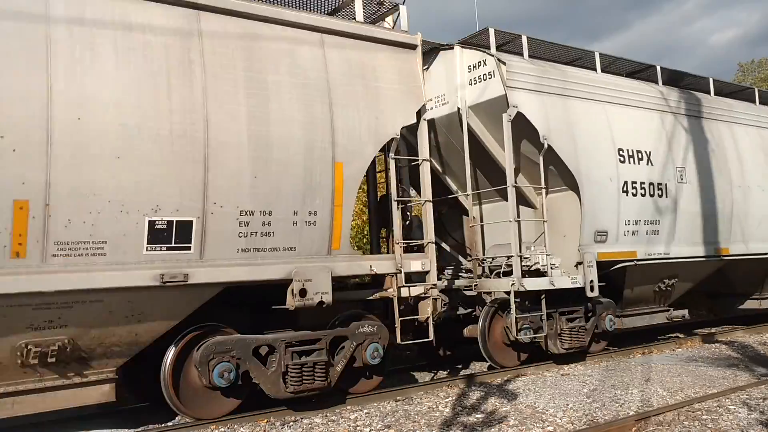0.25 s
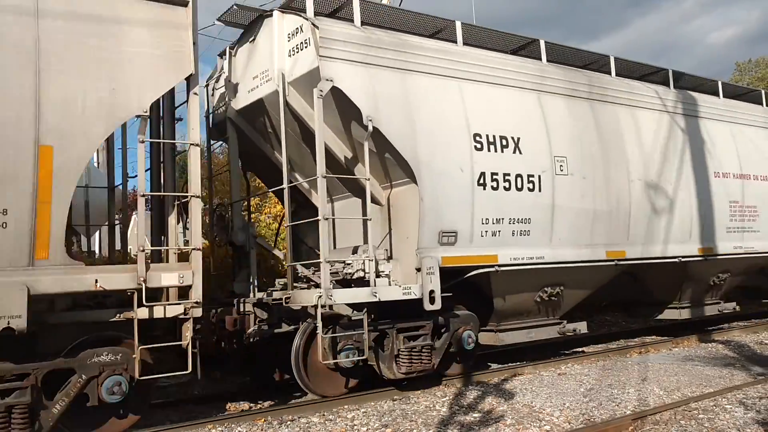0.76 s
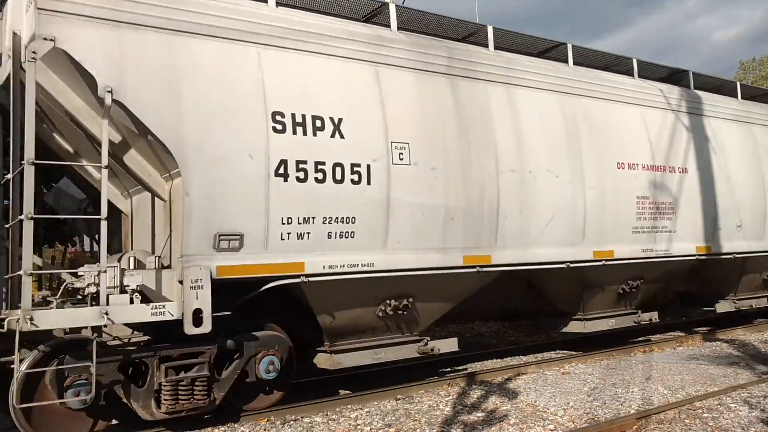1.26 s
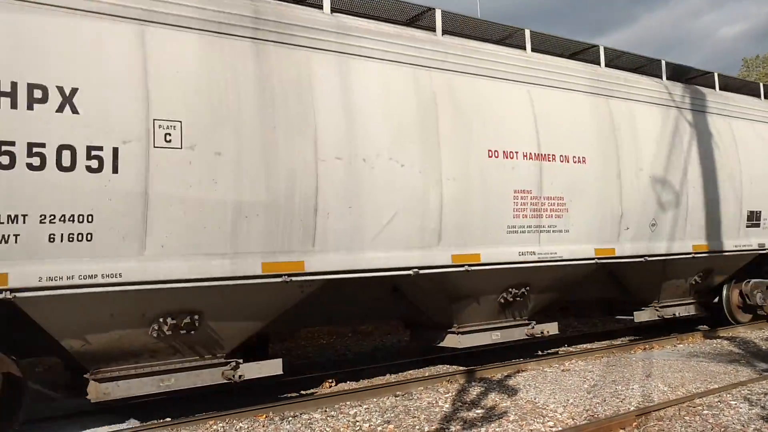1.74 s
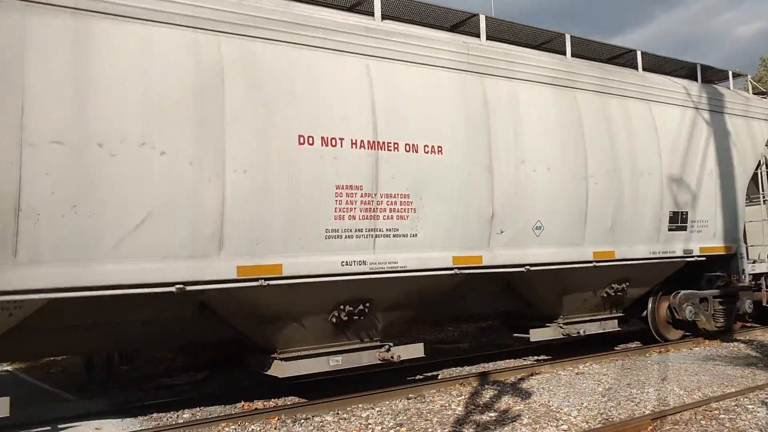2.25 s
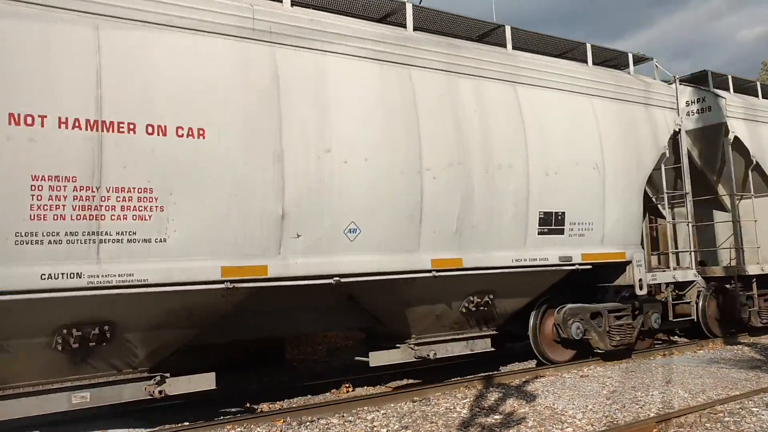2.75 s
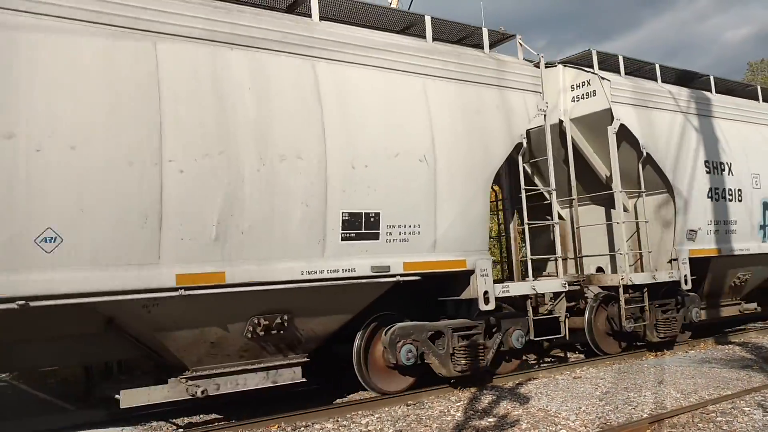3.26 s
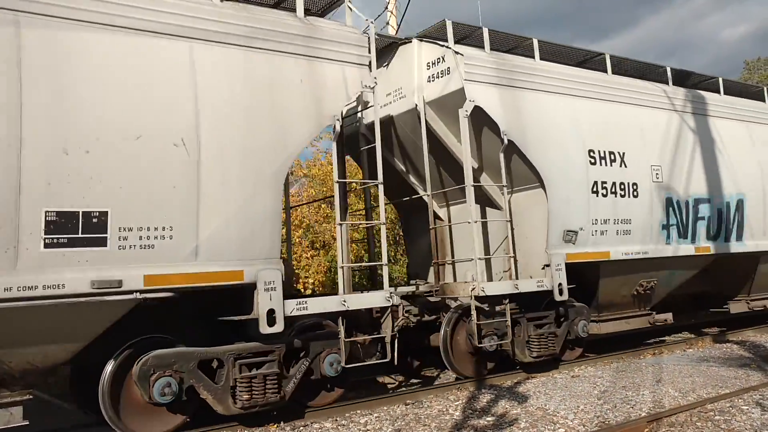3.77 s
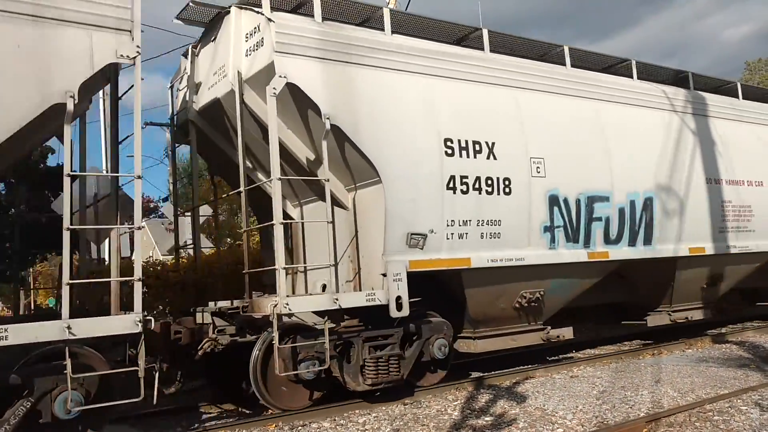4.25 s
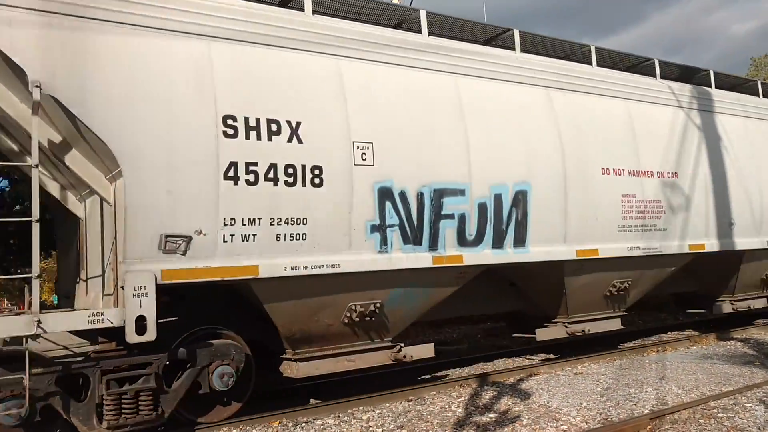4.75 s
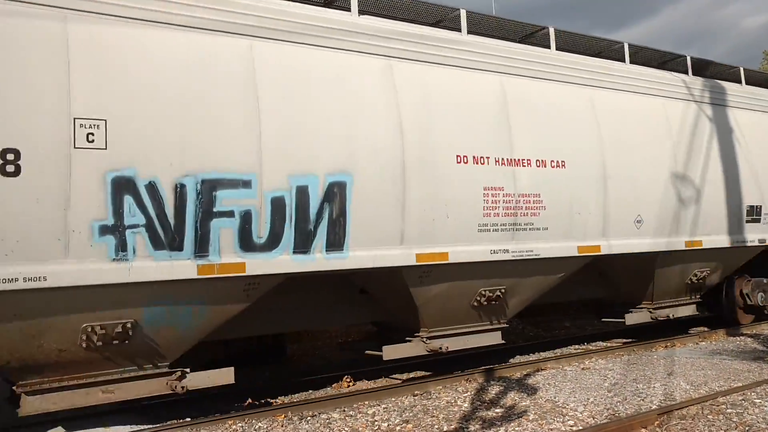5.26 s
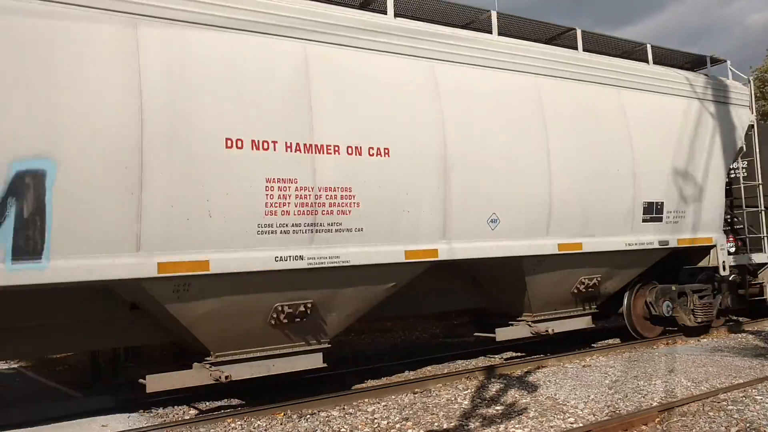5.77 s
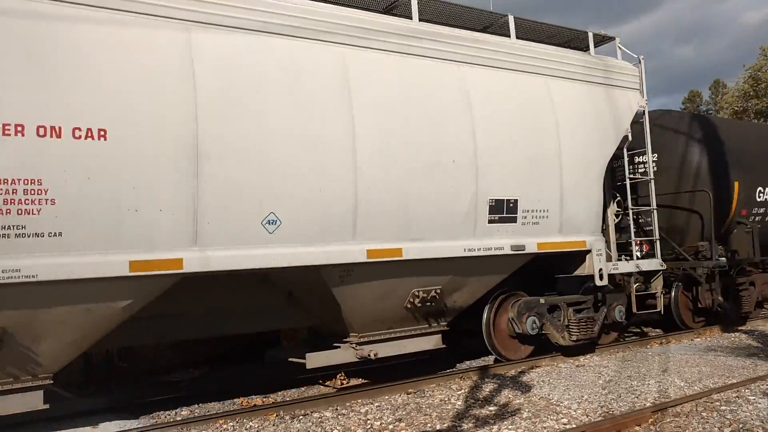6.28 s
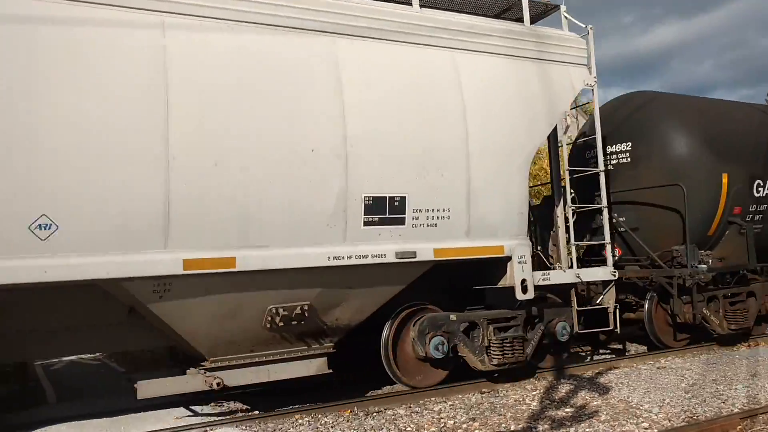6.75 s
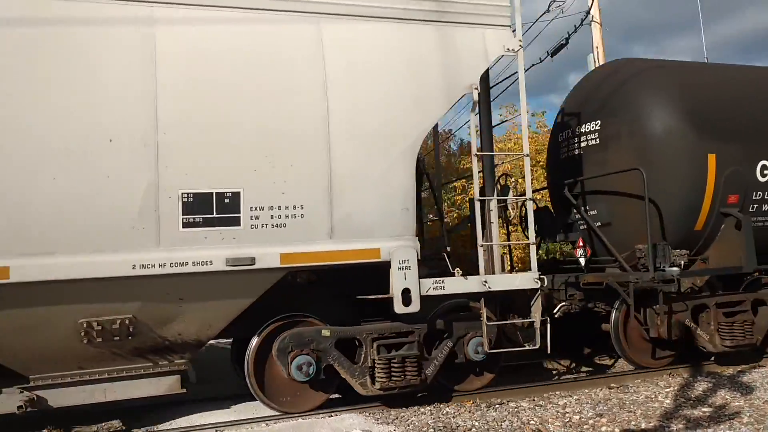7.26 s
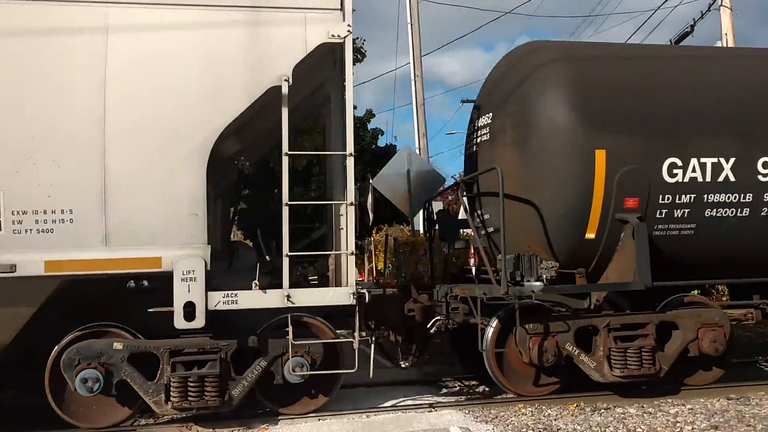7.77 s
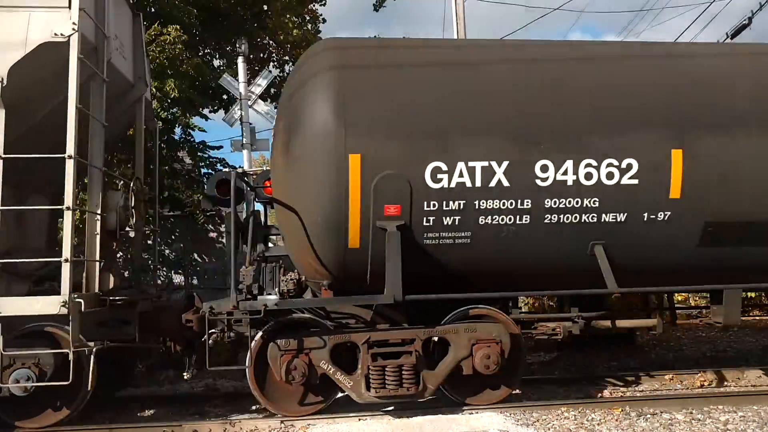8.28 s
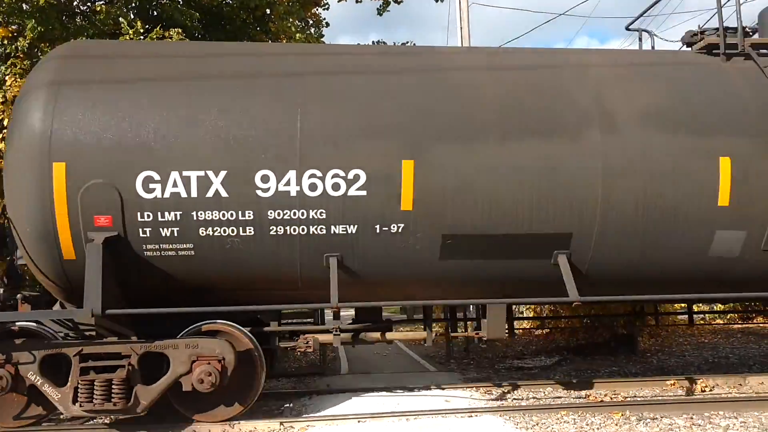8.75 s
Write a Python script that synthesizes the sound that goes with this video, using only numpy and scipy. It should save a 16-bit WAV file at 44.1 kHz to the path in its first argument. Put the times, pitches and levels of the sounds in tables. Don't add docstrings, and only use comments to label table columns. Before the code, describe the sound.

Close beside the track, a coarse metallic rolling roar swells and dips, peppered with hard wheel knocks, clanks and short high steel singing.

```python
import sys
import numpy as np
from scipy import signal
from scipy.fft import rfft, irfft, next_fast_len
from scipy.io import wavfile
from scipy.ndimage import uniform_filter1d, map_coordinates

SR = 44100
rng = np.random.default_rng(int(sys.argv[2]) if len(sys.argv) > 2 else 0)


def elevation(decibels):
    levels = np.asarray(decibels, float)
    return 10 ** (levels / 20)


def store_wav(level_fs):
    pcm = np.round(np.clip(np.atleast_2d(level_fs), -1, 1) * 32767)
    wavfile.write(sys.argv[1], SR, pcm.T.astype(np.int16))


N = 397782

# pitch_hz, level_db (per Hz)
ROAR_TONE = [(200, -12), (400, -8.5), (620, 2), (850, -3.5), (1250, -1), (1700, -5), (2300, -12),
             (3200, -31)]
# pitch_hz, level_db (per Hz)
GRIND_TONE = [(1800, -48), (2600, 1), (3400, 2.5), (4200, -2), (5000, -3.5), (6500, -25)]
# pitch_hz, level_db (per Hz)
HISS_TONE = [(3800, -20), (5200, 0), (7000, -0.5), (8500, -2), (9400, -6.5), (11000, -4), (13500, -23),
             (15000, -22), (15600, -45)]
PORT_DELAY_S = 1 / 2510


def unit(x):
    return x / np.sqrt(np.mean(x ** 2) + 1e-20)


def along(points, hz, column=1):
    rows = np.array(points)
    return np.interp(np.log(hz + 1), np.log(rows[:, 0] + 1), rows[:, column])


def wobble(rate):
    knots = rng.standard_normal(int(N * rate / SR) + 4)
    return map_coordinates(knots, [np.arange(N) * rate / SR])


def filtered(x, response):
    n = x.shape[-1]
    m = next_fast_len(n + 4096)
    spectrum = rfft(x, m) * response(np.fft.rfftfreq(m, 1 / SR))
    return irfft(spectrum, m)[..., :n]


def coloured(x, tone):
    return unit(filtered(x, lambda hz: elevation(along(tone, hz))))


def patchy(depth_db, grit_db):
    z = signal.stft(rng.standard_normal((2, N)), nperseg=512)[2]
    field = uniform_filter1d(rng.standard_normal(z.shape[1:]), 5, 0)
    field = uniform_filter1d(field, 9, 1)
    pair = signal.istft(z * elevation(depth_db * unit(field)), nperseg=512)[1][:, :N]
    return pair * elevation(grit_db * wobble(350))


def add(out, x, s):
    part = out[:, max(round(s * SR), 0):][:, :x.shape[1]]
    part += x[:, :part.shape[1]]


def rolling():
    # time_s, rumble_db, roar_db, grind_db, hiss_db
    passing = [(0.0, -34.5, -31.5, -38.5, -38.5), (0.5, -34, -30.5, -39.5, -42),
               (0.7, -33.5, -27.5, -36.5, -39), (0.85, -35, -29.5, -36.5, -34),
               (1.05, -37.5, -29, -36, -37.5), (1.36, -38, -34.5, -41, -42),
               (1.76, -39.5, -35.5, -41, -42.5), (1.98, -37.5, -32, -40, -42.5), (2.11, -41, -36, -43, -41),
               (2.26, -36.5, -36, -39, -41), (2.36, -37.5, -36, -44, -44), (2.51, -41, -37, -44, -45),
               (2.59, -42.5, -41, -49.5, -48.5), (2.76, -39, -35, -48.5, -48), (2.89, -36, -36, -42, -43),
               (3.04, -37, -29.5, -41.5, -41), (3.34, -37, -29, -39.5, -36), (3.47, -35.5, -29, -37, -36.5),
               (3.67, -34, -27.5, -38, -39), (3.94, -30.5, -25, -40, -40), (4.1, -35, -26.5, -34, -31.5),
               (4.22, -31, -19.5, -28, -24.5), (4.37, -39.5, -29, -38.5, -39.5),
               (4.62, -37.5, -33, -39.5, -40.5), (4.9, -35.5, -32.5, -41.5, -45.5),
               (5.05, -38, -33, -45, -43.5), (5.3, -37, -35.5, -41, -42.5), (5.43, -36.5, -32, -47, -46),
               (5.57, -37.5, -35, -39, -40), (5.75, -35.5, -30.5, -40.5, -39), (5.88, -40, -29, -40, -44),
               (5.95, -40, -38, -51, -50), (6.13, -39.5, -35, -49, -47), (6.23, -37, -32.5, -43, -41),
               (6.35, -37, -27, -42.5, -43), (6.45, -34.5, -29.5, -38.5, -40), (6.61, -31, -23, -39, -39.5),
               (6.73, -38.5, -32, -41.5, -38), (6.86, -31, -21.5, -33, -28.5),
               (7.11, -35, -27.5, -41.5, -44), (7.23, -34.5, -27, -42.5, -40),
               (7.34, -32.5, -21, -33.5, -35), (7.46, -33.5, -23, -33.5, -30), (7.51, -34, -20, -33, -28.5),
               (7.59, -32, -21, -34, -33), (7.71, -33, -27.5, -39, -41), (7.76, -38.5, -33.5, -41.5, -43),
               (7.91, -35, -27.5, -41, -39), (8.06, -39.5, -32, -43, -41), (8.27, -40, -32.5, -41.5, -43.5),
               (8.41, -39.5, -29, -41.5, -44.5), (8.59, -39, -32, -42.5, -45), (8.67, -36.5, -28, -41, -38),
               (9.02, -40, -38.5, -47, -42.5)]
    # pitch_hz, level_db (per Hz)
    rumble_tone = [(25, -33), (50, -4.5), (80, -3.5), (160, 1), (280, -4), (450, -8), (800, -57)]
    time_s, *levels = np.transpose(passing)
    t = np.arange(N) / SR
    rumble_db, roar_db, grind_db, hiss_db = (np.interp(t, time_s, db) for db in levels)
    jolts = wobble(22)
    rumble = elevation(rumble_db + 5.5) * coloured(patchy(1.6, 0.3), rumble_tone)
    roar = elevation(roar_db - 1.5 + 1.27 * jolts) * coloured(patchy(2.36, 1.06), ROAR_TONE)
    grind = elevation(grind_db - 2.65 + 0.87 * jolts) * coloured(patchy(1.57, 1.6), GRIND_TONE)
    hiss = elevation(hiss_db - 2.47 + 1.2 * jolts) * coloured(patchy(2.3, 1.1), HISS_TONE)
    return rumble + roar + grind + hiss


def contacts(t, starts, sizes, life_s):
    age = np.maximum(t - starts, 0)
    hits = sizes * (1 - np.exp(-age / 0.0012)) * elevation(-60 * age / life_s)
    return np.sqrt(np.sum(hits ** 2, axis=0))


def wheel_ring(t, modes):
    hz, mode_db = np.transpose(modes)[:, :, None]
    detuned = hz * rng.normal(1, 0.00606, hz.shape)
    phase = 2 * np.pi * (detuned * t + rng.random((2, len(hz), 1)))
    fade_s = rng.uniform(0.24, 0.75, hz.shape)
    strength = elevation(mode_db + rng.normal(0, 5.1, hz.shape) - 60 * t / fade_s)
    return (1 - np.exp(-t / 0.004)) * np.sum(strength * np.sin(phase), axis=1)


def joints():
    # start_s, knock_db, knock_hz, clank_db and crash_db (over the knock),
    # t60_s (time to die by 60 dB)
    blows = [(0.009, -16, 533, -14, -18.5, 0.15), (0.16, -7, 1220, -13.5, -18, 0.14),
             (0.471, -18, 606, -13, -11.5, 0.22), (0.605, -6.5, 630, -12.5, -21, 0.12),
             (0.804, -6.5, 1080, -13, -18, 0.1), (0.921, -5, 821, -9.5, -17.5, 0.14),
             (1.241, -10.5, 530, -3.5, -10, 0.13), (1.477, -20, 554, -5, -11.5, 0.13),
             (1.693, -7, 575, -7, -14, 0.11), (2.022, -10, 600, -7.5, -13.5, 0.13),
             (2.136, -6.5, 640, -17, -18.5, 0.16), (2.259, -28, 576, 1, -5, 0.13),
             (2.332, -23, 571, -4.5, -17, 0.17), (2.463, -8.5, 1020, -15, -16, 0.14),
             (2.895, -7.5, 1230, -16.5, -11.5, 0.15), (3.124, -15.5, 463, -12, -17.5, 0.19),
             (3.227, -4, 1100, -15.5, -15.5, 0.12), (3.458, -15.5, 1830, -14, -14, 0.12),
             (3.554, -10, 554, -13.5, -17.5, 0.2), (3.9, -13.5, 684, -14, -15.5, 0.18),
             (3.978, -6, 624, -14.5, -27, 0.15), (4.222, -10, 1070, -9, -17, 0.15),
             (4.309, -10, 1370, -5, -10.5, 0.16), (4.648, -10.5, 1000, -7.5, -12, 0.17),
             (4.869, -26, 487, -9, -11, 0.18), (5.073, -8.5, 619, -7.5, -14, 0.13),
             (5.284, -18.5, 664, -19, -25, 0.19), (5.402, -11, 800, -4, -12, 0.16),
             (5.517, -8, 604, -13, -16.5, 0.14), (5.755, -20, 611, -23, -19, 0.14),
             (5.845, -8.5, 497, -18, -12, 0.12), (6.179, -21.5, 506, -16, -19, 0.17),
             (6.286, -9, 1220, -16.5, -10.5, 0.14), (6.609, -7, 670, -12, -14.5, 0.15),
             (6.73, -16.5, 627, -17, -21, 0.14), (6.945, -8, 541, -11, -12.5, 0.1),
             (7.102, -18.5, 1480, -22, -17, 0.22), (7.279, -17, 1040, -14, -10, 0.14),
             (7.373, -7, 627, -16, -17, 0.12), (7.45, -11, 1380, -15, -18, 0.18),
             (7.604, -11, 1400, -11.5, -11.5, 0.23), (7.702, -10.5, 1280, -11, -9.5, 0.18),
             (8.035, -9, 1270, -12, -12.5, 0.13), (8.248, -16, 1340, -13.5, -11, 0.18),
             (8.476, -6, 564, -16.5, -16.5, 0.11), (8.682, -23, 1210, -16, -13, 0.14),
             (8.8, -6.5, 570, -15, -14.5, 0.11), (8.964, -7, 1280, -18.5, -19.5, 0.13)]
    # pitch_hz, level_db
    modes = [(1800, -4), (2200, -1), (2730, 8), (3305, 4.5), (3835, -9), (3960, 7), (4500, 0), (5200, 1),
             (6450, -3), (6860, -20), (7600, 1), (8690, -10), (8770, -4.5), (10020, -12)]
    out, t = np.zeros((2, N)), np.arange(SR // 2) / SR
    for s, db, knock_hz, clank_db, crash_db, t60 in blows:
        noise = rng.standard_normal((3, 2, len(t)))
        later = rng.uniform(0.0035, 0.02, (3, 1))
        starts = np.vstack([[0], later])
        sizes = elevation(np.vstack([[0], rng.normal(-6, 2.2, (3, 1))]))
        tail = (1 - np.exp(-t / 0.0032)) * elevation(-60 * t / (2.66 * t60))
        knock_shape = contacts(t, starts, sizes, 0.45 * t60) + elevation(-9.5) * tail
        clank_shape = contacts(t, starts, sizes, 0.5 * t60) + elevation(-14.5) * tail
        crash_shape = contacts(t, starts, sizes, 0.56 * t60) + elevation(-4.5) * tail

        def body(hz):
            return elevation(along(ROAR_TONE, hz)) * (1 + 0.92 / np.hypot(1, (hz - knock_hz) / 130))

        knock = elevation(db - 8.5) * unit(filtered(noise[0], body)) * knock_shape
        clank = elevation(db + clank_db - 5.5) * coloured(noise[1], GRIND_TONE) * clank_shape
        crash = elevation(db + crash_db - 6) * coloured(noise[2], HISS_TONE) * crash_shape
        ring = elevation(db + clank_db - 27.5) * wheel_ring(t, modes)
        add(out, knock + clank + crash + ring, s - 0.003)
    return out


def singing():
    # start_s, length_s, pitch_hz, level_db (rms)
    tones = [(0.16, 0.2, 6897, -44), (0.64, 0.1, 7700, -46), (0.95, 0.15, 4553, -44),
             (0.96, 0.2, 3420, -38), (0.98, 0.16, 4000, -42), (1.22, 0.13, 9320, -52),
             (1.22, 0.23, 7365, -45), (1.26, 0.26, 3830, -37), (1.27, 0.27, 3970, -46),
             (1.29, 0.26, 3318, -36), (1.44, 0.1, 3430, -42), (1.45, 0.08, 8600, -38),
             (1.47, 0.14, 8700, -43.5), (1.67, 0.22, 3820, -42), (1.99, 0.17, 3850, -42.5),
             (2.02, 0.11, 3370, -31), (2.23, 0.09, 3000, -43), (2.23, 0.18, 3440, -37),
             (2.9, 0.13, 2744, -34), (3.27, 0.15, 7350, -39), (3.39, 0.16, 5287, -45),
             (3.6, 0.16, 4057, -41), (3.96, 0.17, 3846, -40), (4.64, 0.21, 3960, -51),
             (5.12, 0.28, 3940, -47), (5.13, 0.25, 5170, -52), (5.38, 0.11, 2167, -50),
             (5.38, 0.11, 3876, -36.5), (5.44, 0.29, 3294, -36), (5.57, 0.13, 7615, -47),
             (5.63, 0.14, 8830, -43.5), (6.67, 0.11, 10019, -37), (7.05, 0.24, 4506, -49),
             (7.38, 0.1, 7700, -34), (7.59, 0.09, 3151, -39), (7.68, 0.14, 2200, -36),
             (7.7, 0.18, 2700, -47), (7.78, 0.17, 8696, -50), (7.78, 0.2, 6830, -46),
             (8.01, 0.12, 2180, -37), (8.05, 0.19, 3962, -42), (8.09, 0.16, 5198, -43),
             (8.44, 0.16, 8690, -40), (8.51, 0.074, 8750, -39), (8.79, 0.21, 5120, -33.5),
             (8.83, 0.1, 2360, -33), (8.84, 0.14, 8850, -43), (8.84, 0.2, 7472, -46)]
    out, drift, beat = np.zeros((2, N)), wobble(30), wobble(25)
    for s, length, hz, db in tones:
        t = np.arange(round(1.29 * length * SR)) / SR
        shift = rng.integers(N - len(t))
        swell = np.sin(np.pi * (t / t[-1]) ** 0.49) ** 0.88
        swell = swell * elevation(3.7 * beat[shift:][:len(t)])
        phase = 2 * np.pi * (hz * t + rng.random((2, 1))) + 0.84 * drift[shift:][:len(t)]
        add(out, elevation(db - 2.5) * swell * np.sin(phase), s)
    return out


def scene():
    # pitch_hz, louder_db, likeness (0-1),
    # extra_lead (beyond the port delay) [radians]
    ports = [(60, 4, .99, -0.014), (270, 2.5, 0.97, -0.52), (500, 0.1, 0.88, -0.58),
             (630, -0.9, 0.93, 0.026), (790, -4, 0.74, 0.47), (967, 1, .55, 0.93), (1540, -2.5, 0.16, 0.26),
             (3000, 4.5, 0.12, -0.23), (5900, 3, 0.41, 0.13), (8200, 5.5, 0.58, 0.33),
             (9320, 7, 0.18, -0.15), (10400, -7.3, .1, .1), (15000, -7.7, 0.2, .1)]
    first, other = rolling() + joints() + singing()

    def louder(hz):
        return elevation(along(ports, hz))

    def alike(hz):
        return np.clip(along(ports, hz, column=2), 0, 1)

    def lead(hz):
        return np.exp(1j * (2 * np.pi * hz * PORT_DELAY_S + along(ports, hz, column=3)))

    shared = filtered(first, lambda hz: louder(hz) * alike(hz) * lead(hz))
    own = filtered(other, lambda hz: louder(hz) * np.sqrt(1 - alike(hz) ** 2))
    return np.array([first, shared + own])


def top_cut(x):
    return signal.sosfilt(signal.butter(12, 15770, fs=SR, output="sos"), x)


def record(dry):
    crossed = filtered(dry[::-1], lambda hz: 0.95 * np.exp(-2j * np.pi * hz * PORT_DELAY_S))
    return top_cut(dry - crossed)


dry = scene()
out = record(dry)
store_wav(out)
```